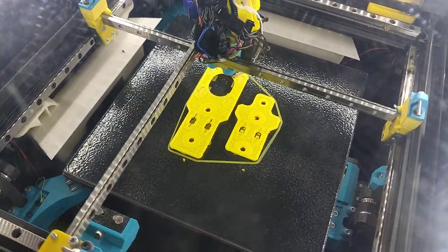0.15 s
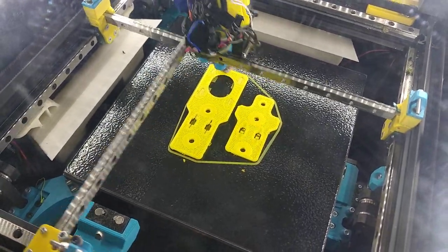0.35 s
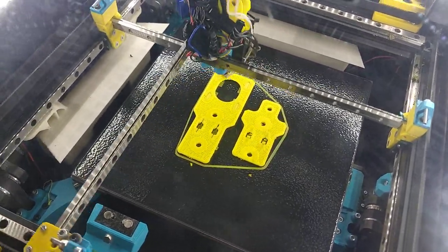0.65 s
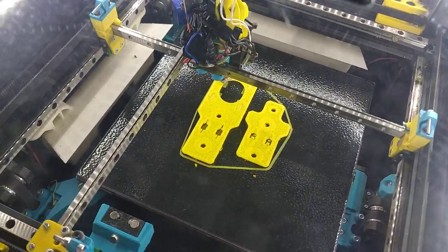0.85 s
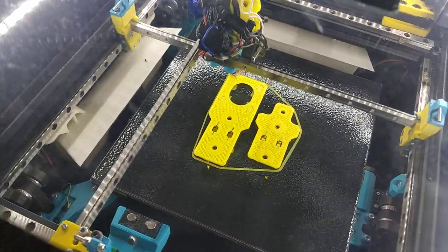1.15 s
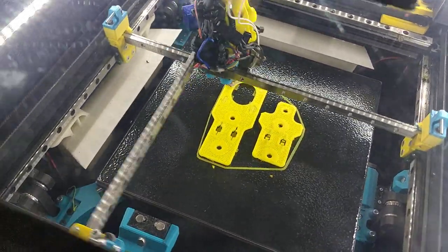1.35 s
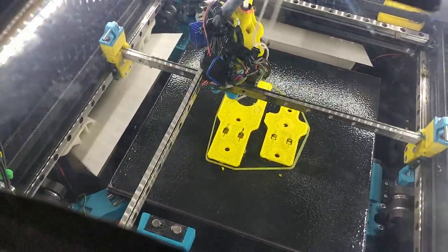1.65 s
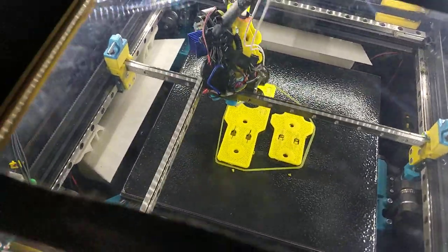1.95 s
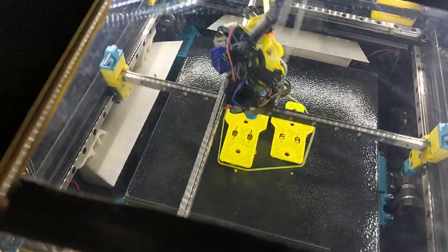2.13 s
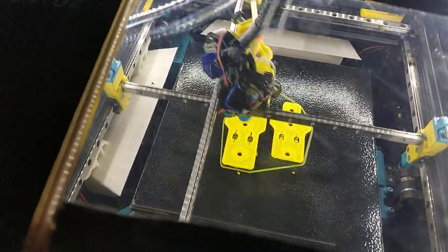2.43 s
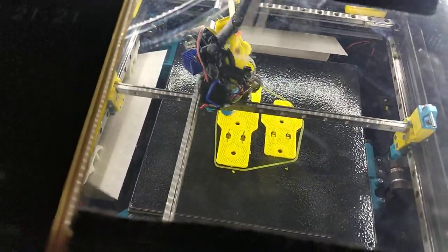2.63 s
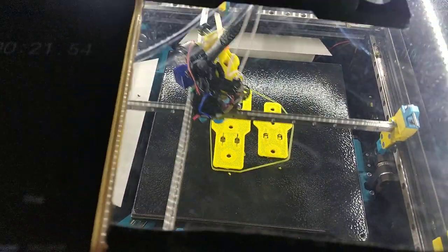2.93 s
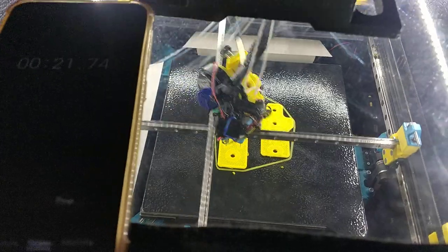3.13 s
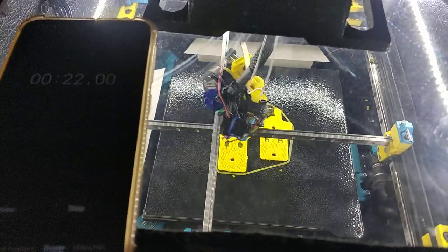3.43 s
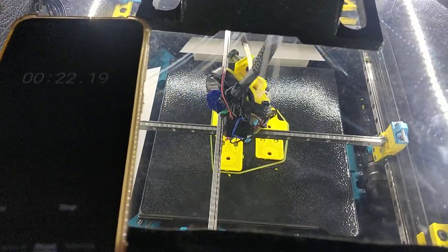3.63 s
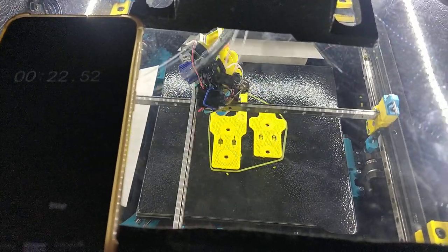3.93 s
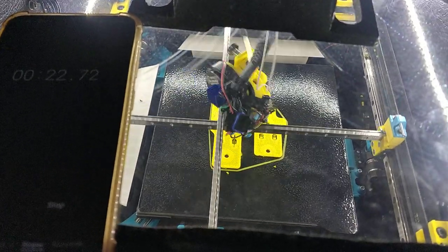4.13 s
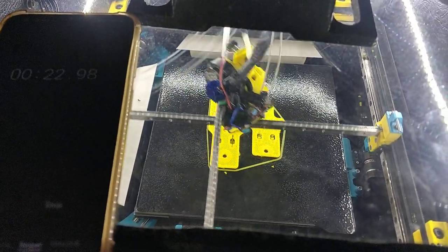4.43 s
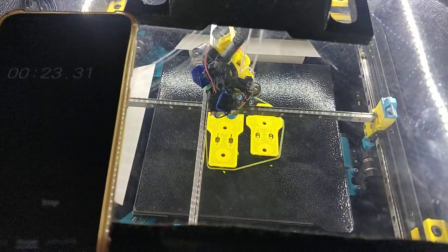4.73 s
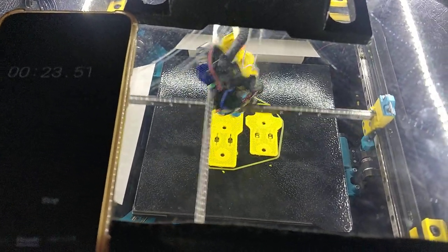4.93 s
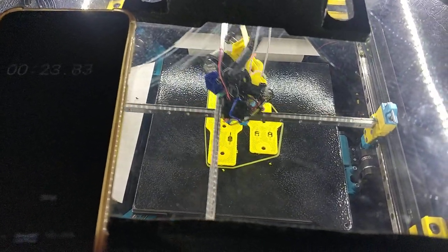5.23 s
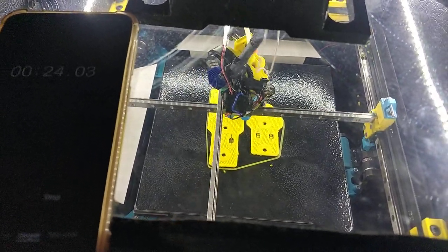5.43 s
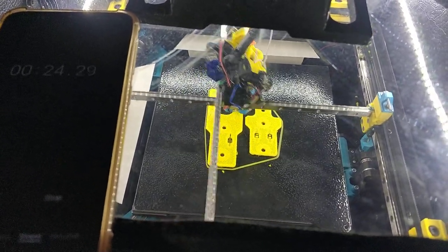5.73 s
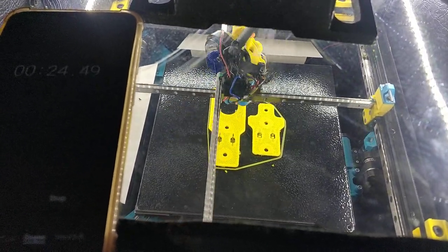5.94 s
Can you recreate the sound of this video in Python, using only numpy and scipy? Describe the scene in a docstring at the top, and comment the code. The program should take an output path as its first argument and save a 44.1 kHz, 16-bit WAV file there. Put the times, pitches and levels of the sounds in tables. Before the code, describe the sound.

A 3D printer runs fast, heard from just above its cabinet. The motors chirp and buzz in short strokes, the rails rumble and the frame hums low over steady fan hiss. A soft pop hits the right side near the start. Irregular thuds and faint bright ticks follow as the print head changes direction. The motion eases briefly, then tightens into a run of quick clacks near the end.

```python
"""3D printer, close overhead

Microphones just above the cabinet, where a fast printer fills in a small part. Short strokes of the
head shake the frame, panel and gantry; the steppers chirp and the carriages rumble on their rails.
Fans hum and hiss throughout. Filament ticks, one pop of pressure lands on the right, hard reversals
knock and loose wiring clicks. Near the end the head zigzags tightly and the thuds turn to clacks."""
import sys
import numpy as np
from scipy import signal
from scipy.fft import rfft, irfft
from scipy.io import wavfile
from scipy.ndimage import uniform_filter1d

SR = 44100
rng = np.random.default_rng(int(sys.argv[2]) if len(sys.argv) > 2 else 0)


def to_wav(s):
    """Save 16-bit WAV."""
    ch = np.atleast_2d(s).T  # columns
    pcm = np.round(np.clip(ch, -1, 1) * 32767)  # PCM
    wavfile.write(sys.argv[1], SR, pcm.astype(np.int16))


N = 268128
TIME = np.arange(N) / SR
FREQS = np.maximum(np.fft.rfftfreq(N, 1 / SR), 1)
ZIGZAG_FROM_S = 5.3

# Levels in the tables are relative: each source adds its own gain.
# how hard the head is thrown about, easing over small details: time_s, effort_db
EFFORT = [(0.0, -5), (0.7, -1.5), (1.25, -4), (1.7, 0.5), (2.0, 3), (2.25, -2.5), (2.6, 0.5), (3.1, -4.5),
          (3.45, -1.5), (3.9, -3.5), (4.1, -8.5), (4.6, -9.5), (4.8, -7.5), (5.4, -1.5), (6.08, -3.5)]
# the head slows between runs of strokes: centre_s, length_s, depth_db
LULLS = [(0.067, 0.024, 8), (0.647, 0.081, 15), (1.385, 0.044, 3), (1.746, 0.07, 10), (1.86, 0.044, 16),
         (2.21, 0.2, 0), (2.528, 0.024, 16), (2.794, 0.19, 2), (2.996, 0.087, 4), (3.325, 0.1, 3),
         (3.57, 0.12, 6), (4.19, 0.035, 1), (4.623, 0.049, 12), (4.9, 0.1, 6), (5.285, 0.072, 15),
         (5.714, 0.065, 14)]
# hard thrusts that rock the whole frame: centre_s, length_s, level_db
THRUSTS = [(0.008, 0.019, -23.5), (0.097, .044, -46), (0.366, .05, -42), (0.471, 0.063, -36),
           (0.574, .06, -42), (0.736, 0.091, -34), (0.829, .045, -35), (0.929, 0.069, -32),
           (1.035, .06, -34), (1.111, .055, -26.5), (1.252, 0.073, -30), (1.324, .055, -33),
           (1.464, 0.062, -27), (1.568, 0.0774, -29), (1.912, .044, -33.5), (1.989, 0.085, -26),
           (2.093, 0.04, -32.5), (2.348, 0.076, -29.5), (2.44, .06, -32), (2.651, .06, -47),
           (2.909, .052, -32), (3.075, .059, -33.5), (3.148, 0.058, -31), (3.473, 0.06, -40),
           (3.761, .06, -38), (3.889, .062, -32), (4.76, 0.068, -39), (4.958, 0.05, -36),
           (5.096, .053, -36.5), (5.189, 0.13, -33), (5.577, 0.079, -31), (5.75, 0.13, -36.5),
           (5.892, .08, -31), (5.999, 0.13, -32)]
# the microphones start where the frame sways most, then move off: time_s, boost_db
NEAR_FRAME = [(1.0, 4.5), (1.9, 0)]
# rumble from the rails: time_s, level_db
RAIL_LEVEL = [(0.0, 1.5), (0.55, 1), (0.65, 0), (0.8, 0), (2.0, 0.5), (2.8, 0), (3.7, -1), (3.98, 0),
              (4.1, -0.5), (5.3, 0.5), (6.08, 1.5)]
# spectrum of rails and motors: frequency_hz, level_db
RAIL_SPECTRUM = [(20, 7.5), (45, -16), (85, -23), (135, -2), (230, 4.5), (370, 2.5), (430, -0.5), (600, -4),
                 (830, -6), (920, -10.5), (1060, -9.5), (1300, -17.5), (1750, -22), (2600, -42)]
# likeness of the two microphones: frequency_hz, correlation
MIC_LIKENESS = [(40, 0.87), (160, 0.78), (330, 0.98), (700, 0.62), (1400, 0), (2800, 0.092), (16000, 0)]
# air from the fans: time_s, flow_db
AIRFLOW = [(0.0, 1), (1.0, 0.5), (2.15, 3), (3.3, 0.5), (3.85, 1.5), (4.05, 0), (4.7, 1), (5.7, 1.5),
           (6.0, 5)]
# spectrum of the rushing air: frequency_hz, level_db
RUSH_SPECTRUM = [(300, 7.5), (1200, 7.5), (2200, 4), (3200, 2), (4100, -0.5), (5100, -2), (6000, -10),
                 (6700, -8), (7700, -11), (8900, -27), (9900, -52), (15500, -37)]
# spectrum of the fine hiss: frequency_hz, level_db
HISS_SPECTRUM = [(8500, -35), (10000, -5.5), (11300, 1), (12500, 6), (14800, 5.5), (16000, 2.5)]
# the cooling duct's jet, turned towards and away from the microphones: time_s, level_db
JET_LEVEL = [(0.0, -62), (0.4, -63.5), (1.45, -63), (1.8, -65.5), (3.5, -70.5), (3.82, -63), (4.05, -79),
             (4.9, -66), (6.0, -64)]
# blade tone of the part-cooling fan, which turns away as the head moves: time_s, level_db
BLADE_LEVEL = [(0.0, -57), (0.7, -57.5), (1.1, -60), (1.9, -60.5), (2.2, -57), (2.8, -59), (3.6, -67),
               (3.9, -62), (4.6, -63), (5.7, -70), (6.08, -67)]
# fan and motor driver tones: pitch_hz, level_db
THIN_TONES = [(500, -63), (728, -66), (1100, -66), (1201, -70), (1664, -69), (2000, -80), (2100, -75),
              (2200, -77), (13001, -89), (13501, -87), (13701, -89)]
# ticks of filament and cable sleeve: start_s, level_db, relative_rasp_db, t60_s, centre_hz
TICKS = [(0.075, -50.5, -17, 0.021, 11100), (1.005, -44.5, -20, 0.025, 11980),
         (1.251, -48, -13, 0.018, 12600), (2.4198, -51, -18, 0.036, 12800), (2.6344, -61, -14, 0.04, 12700),
         (2.8219, -55, -17, 0.042, 12710), (3.312, -59, 4, 0.083, 11200), (3.417, -54, 2, 0.058, 11600),
         (3.423, -57.5, 7.5, 0.1, 12400), (5.0269, -38, -25, 0.015, 13900), (5.233, -58.5, 7, 0.072, 11400),
         (5.5947, -57, 7.5, 0.048, 13120)]
# quick passes that make the gantry sing: centre_s, length_s, level_db, step_rate_hz
PASSES = [(0.166, .041, -38.5, 332), (0.407, .044, -37, 329), (0.517, 0.085, -40.5, 326.5),
          (0.695, .044, -39, 314.3), (0.766, 0.07, -44, 326), (1.158, 0.05, -35, 314.7),
          (1.3, .055, -30, 321), (1.387, .041, -36, 326), (1.43, 0.043, -34, 313),
          (1.496, 0.035, -34.5, 330.6), (1.555, 0.041, -36.5, 330.3), (1.606, 0.035, -36, 329.8),
          (1.678, .035, -38, 329), (1.799, .07, -33.5, 323.6), (1.895, 0.046, -35.5, 315.5),
          (2.058, .07, -35, 318.7), (2.132, 0.045, -30.5, 331), (2.341, 0.058, -32, 320.2),
          (2.465, .07, -44.5, 330), (2.603, 0.051, -38, 329), (2.687, .07, -40, 323.2),
          (2.76, 0.077, -41.5, 334.5), (2.83, 0.064, -40, 330.2), (3.143, 0.054, -42, 316),
          (3.448, 0.087, -45, 325.6), (3.806, .051, -35.5, 330.5), (4.39, .041, -41, 336),
          (4.648, 0.029, -36.5, 323.3), (4.713, .03, -39, 323.6), (4.749, 0.04, -35.5, 332),
          (4.824, 0.035, -36.5, 333), (4.859, .028, -37, 326), (4.949, 0.041, -35, 329),
          (5.007, .03, -37, 320), (5.041, 0.029, -34.5, 337.6), (5.112, 0.037, -38.5, 330.5),
          (5.35, .05, -37.5, 330), (5.425, 0.042, -38, 313.3), (5.533, 0.048, -38, 323.4),
          (5.66, 0.037, -36, 333.4), (5.786, .052, -35.5, 323.8), (5.89, 0.068, -34, 326),
          (5.978, 0.025, -30.5, 327.3)]
# reversals that take up slack: start_s, blow_db, boom_db
KNOCKS = [(0.365, -35.5, -44), (0.584, -33.5, -50), (0.784, -41, -17), (1.221, -60, -20.5),
          (1.339, -38, -27.5), (1.4437, -37, -25), (1.554, -35.5, -19.5), (1.9263, -40, -21.5),
          (2.01, -34, -12.5), (2.0688, -34.5, -15.5), (2.106, -38, -43), (2.3414, -34.5, -16),
          (2.647, -40, -18), (2.906, -32.5, -17.5), (3.075, -35, -17), (3.1633, -34, -21),
          (3.179, -40, -20), (3.397, -31.5, -20), (3.426, -31, -18), (3.4716, -33, -19),
          (3.488, -29.5, -22), (3.699, -43, -31), (3.888, -33.5, -19.5), (4.231, -35.5, -23),
          (4.287, -35.5, -31.5), (4.7178, -34, -37), (4.759, -33.5, -23.5), (4.965, -36.5, -22),
          (5.1673, -31.5, -14.5), (5.1765, -36, -24), (5.411, -30.5, -35), (5.4449, -33.5, -40),
          (5.513, -31, -43), (5.544, -27, -30), (5.6, -24, -28), (5.638, -39, -21.5), (5.822, -28, -25),
          (5.8635, -30.5, -40), (5.9195, -31, -39), (5.9324, -26.5, -41), (5.973, -30, -50),
          (6.0106, -31, -50), (6.0287, -27, -42), (6.0416, -28, -32)]
# modes of the gantry at the end of an open stroke: pitch_hz, t60_s, level_db
THUD_MODES = [(333, 0.064, 2), (502, 0.026, 1), (630, 0.017, 6.5), (758, 0.014, 4), (973, 0.019, -2.5),
              (1360, 0.011, -5.5), (1660, .012, -12)]
# modes of the booming panel: pitch_hz, t60_s, level_db
PANEL_MODES = [(154, 0.048, -12.5), (184.3, 0.1, 0.5), (265, 0.064, -8.5)]
# modes of the carriage in the tight zigzag: pitch_hz, t60_s, level_db
CLACK_MODES = [(345, .04, -1), (570, .014, -2.5), (770, .016, -1), (995, .02, 1), (1150, .014, 1),
               (1675, .015, 0), (2700, .014, -3)]
# loose wiring on the head: start_s, peak_db
WIRING_CLICKS = [(1.852, -51), (1.866, -45), (1.897, -43), (1.9231, -46), (1.95, -48)]

# how each part follows effort (the air follows flow): base_db, db_per_db, lull_share
FRAME_DRIVE, SHUDDER_DRIVE = (-36.5, .55, .58), (-41.5, 1.65, .22)
PANEL_DRIVE, GANTRY_DRIVE, RAIL_DRIVE = (-41, .92, .79), (-44, .7, .4), (-44.5, .086, .26)
RUSH_DRIVE, HISS_DRIVE = (-60.5, .83, .17), (-69, 1.24, .23)


def undb(db):
    """Decibels to gain."""
    return 10 ** (np.asarray(db) / 20)


def unit(x):
    """Scale to rms 1."""
    return x / np.sqrt(np.mean(x ** 2))


def curve(table, column=1):
    """One column of a timed table, with a value for every sample."""
    columns = np.transpose(table)
    return np.interp(TIME, columns[0], columns[column])


def across(points):
    """Join (frequency_hz, value) points on a log-frequency axis."""
    hz, value = np.transpose(points)
    return np.interp(np.log(FREQS), np.log(hz), value)


def colour(x, spectrum):
    """Filter a sound by a spectrum, at rms 1."""
    return unit(irfft(rfft(x) * undb(across(spectrum)), N))


def resonate(x, hz, width_hz):
    """A two-pole resonance."""
    return signal.lfilter(*signal.iirpeak(hz, hz / width_hz, fs=SR), x)


def lowpass(x, hz, order):
    """A causal low-pass."""
    return signal.sosfilt(signal.butter(order, hz, fs=SR, output="sos"), x)


def wander(rate_hz):
    """Smooth random drift with a spread near 1."""
    hold = int(SR / rate_hz)
    steps = np.repeat(rng.standard_normal(N // hold + 1), hold)
    return 1.3 * uniform_filter1d(steps, hold)[:N]


def glide(hz):
    """A sine of rms 1 that follows a pitch."""
    return np.sqrt(2) * np.sin(2 * np.pi * np.cumsum(hz) / SR)


def pan(left_db):
    """Channel gains that put the left microphone left_db above the right."""
    return undb(np.array([[left_db], [-left_db]]) / 2)


def add(track, start_s, sound):
    """Mix a sound in at start_s."""
    i = max(int(start_s * SR), 0)
    track[i:i + len(sound)] += sound[:N - i]


def swell(centre_s, length_s):
    """A smooth rise and fall, 1 at its top and length_s wide at half height."""
    return np.exp(-np.log(2) * np.minimum((2 * (TIME - centre_s) / length_s) ** 2, 50))


def surges(rows):
    """Strength of a run of swells, summed in power."""
    return np.sqrt(sum((undb(db) * swell(s, length_s)) ** 2 for s, length_s, db, *_ in rows))


def driven(drive, control_db, lull_db):
    """Level in dB of a part that follows a control and sinks in the lulls."""
    base_db, db_per_db, lull_share = drive
    return base_db + db_per_db * control_db - lull_share * lull_db


def head_strokes(stroke_s=.045, scatter=.45, count=400):
    """The head speeds up and brakes along each short line: its relative speed, and a jerk at each turn."""
    chance = rng.standard_normal((count, 3))
    turns_s = np.cumsum(stroke_s * np.exp(scatter * chance[:, 0]))
    progress = np.interp(TIME, np.r_[0, turns_s], np.arange(count + 1))
    stroke = progress.astype(int)
    cruise = np.exp(.25 * chance[:, 1])[np.minimum(stroke, count - 1)]
    speed = cruise * np.minimum(1.4 * np.abs(np.sin(np.pi * progress)), 1)
    jerks = np.diff(stroke, prepend=0) * cruise * (-1.) ** stroke
    return speed, jerks


def shaken(jerks, hz, width_hz, rough, even_s):
    """Jerks and rolling roughness keep one resonance ringing at an even strength."""
    push = unit(jerks) + rough * rng.standard_normal(N)
    swing = resonate(resonate(push, hz, width_hz), hz, 2 * width_hz)
    return swing / np.sqrt(uniform_filter1d(swing ** 2, int(even_s * SR)) + 1e-12)


def frame_sway(jerks, frame_db, shudder_db, mode_hz=55, shudder_hz=132):
    """The heavy frame hums at its lowest mode, heaves and twists a little; its joints shudder."""
    strength = np.hypot(undb(frame_db - 3), undb(-1.5) * surges(THRUSTS))
    hum = strength * glide(mode_hz * (1 + .062 * wander(16)))
    loose = shaken(jerks, mode_hz, width_hz=13, rough=.87, even_s=.11) * undb(frame_db - 7)
    rocking = signal.sosfiltfilt(signal.butter(6, 68, fs=SR, output="sos"), hum + loose)
    shudder = unit(resonate(resonate(rng.standard_normal(N), shudder_hz, 71), shudder_hz, 90))
    rumble = lowpass(rng.standard_normal((2, N)), 68.4, order=4)
    heave, twist = unit(resonate(rumble, hz=40.7, width_hz=15.6))
    feet = undb(-7) * heave + undb(-9) * twist * np.array([[1], [-1]])
    return rocking * pan(2.2) + undb(shudder_db) * shudder + undb(frame_db) * feet


def panel_drone(jerks, level_db, zigzag_db=4.5):
    """The strokes keep a cabinet panel ringing, harder in the tight zigzag."""
    zigzag = uniform_filter1d(1. * (TIME > ZIGZAG_FROM_S), SR // 20)
    ringing = shaken(jerks, hz=187, width_hz=26, rough=.86, even_s=.072)
    return ringing * undb(level_db + zigzag_db * zigzag)


def gantry_drone(jerks, level_db):
    """The same strokes ring the gantry, higher in pitch than the panel."""
    return shaken(jerks, hz=326, width_hz=20, rough=.61, even_s=.068) * undb(level_db)


def rails(speed):
    """Bearing balls and belt teeth patter, louder in the middle of a stroke."""
    patter = rng.standard_normal(N) * undb(2 * wander(350)) * (1 + .25 * speed)
    return colour(patter, RAIL_SPECTRUM)


def steppers(speed, step_hz=430, overtone_db=-5):
    """Each of two motors sings at its step rate, so every stroke is a short chirp."""
    chirps = 0
    for share in (1, np.exp(.25 * wander(12))):
        phase = 2 * np.pi * np.cumsum(step_hz * speed * share) / SR
        chirps += sum(undb(overtone_db * k) * np.sin((k + 1) * phase) for k in range(4))
    return colour(chirps, RAIL_SPECTRUM)


def cabinet_scatter(x, t60_s=.11):
    """Close walls scatter the sound: bass stays alike at both microphones, treble does not."""
    t = TIME[:SR // 8]
    echoes = rfft(rng.standard_normal(len(t)) * undb(-60 * t / t60_s), N)
    alike = across(MIC_LIKENESS)
    mid = irfft(rfft(x) * np.sqrt((1 + alike) / 2), N)
    side = irfft(rfft(x) * np.exp(1j * np.angle(echoes)) * np.sqrt((1 - alike) / 2), N)
    return np.array([mid + side, mid - side])


def thin_tone(hz, level_db, waver_hz=3):
    """A fan or motor driver tone that wavers in pitch and strength."""
    return undb(level_db + 1.8 * wander(9.7)) * glide(hz + waver_hz * wander(14))


def fans(lull_db, jet_hz=5150, blade_hz=989):
    """Rushing air, a jet from the cooling duct, a fine hiss on the left and thin tones."""
    flow_db = curve(AIRFLOW)
    gust_db = 1.1 * wander(18) + .8 * wander(150)
    rush = colour(rng.standard_normal((2, N)), RUSH_SPECTRUM)
    rush *= undb(driven(RUSH_DRIVE, flow_db, lull_db) + 7)
    jet = unit(resonate(resonate(rng.standard_normal((2, N)), jet_hz, 1700), jet_hz, 1700))
    jet *= undb(curve(JET_LEVEL) - .25 * lull_db - 1)
    hiss = colour(rng.standard_normal((2, N)), HISS_SPECTRUM)
    hiss *= undb(driven(HISS_DRIVE, flow_db, lull_db) + 2.5) * pan(10.2)
    blade = thin_tone(blade_hz, curve(BLADE_LEVEL), waver_hz=4) * pan(2)
    tones = np.array([sum(thin_tone(hz, db) for hz, db in THIN_TONES) for _ in range(2)])
    return (rush + jet + hiss) * undb(gust_db) + blade + tones


def filament_ticks(rise_s=.001, width_hz=2600):
    """Filament and cable sleeve make small bright scrapes on the left, each at its own pitch."""
    out, t = np.zeros(N), TIME[:SR // 8]
    for start_s, level_db, rasp_db, t60_s, hz in TICKS:
        noise = rng.standard_normal((2, len(t)))
        bright = unit(resonate(resonate(noise[0], hz, width_hz), hz, width_hz))
        rasp = undb(rasp_db - 5) * unit(resonate(noise[1], hz=6000, width_hz=1800))
        envelope = (1 - np.exp(-t / rise_s)) * undb(-60 * t / t60_s)
        add(out, start_s, undb(level_db - 2.5) * (bright + rasp) * envelope)
    return out * pan(15)


def gantry_song(sag=.03):
    """The gantry sings at the step rate, which sits lower while the head speeds up and brakes."""
    cruising = np.minimum(sum(swell(s, length_s) for s, length_s, *_ in PASSES), 1)
    step_hz = curve(PASSES, column=3) * (1 + sag * (cruising - .8) + .008 * wander(30))
    return undb(-1) * surges(PASSES) * glide(step_hz)


def pressure_pop(start_s=.2265, decay_s=.05, swing_hz=7):
    """A pop of pressure with a sharp front, mostly on the right microphone."""
    out, t = np.zeros(N), TIME[:SR // 4]
    front = 1 - (1 - undb(-5)) * np.exp(-t / .00048)
    add(out, start_s, undb(-19) * front * np.exp(-t / decay_s) * np.cos(2 * np.pi * swing_hz * t))
    out -= resonate(out, hz=8700, width_hz=4400)  # the microphone is deaf near 9 kHz
    return lowpass(out, 14000, order=1) * np.array([[.15], [1.9]])


def struck(modes, t, scatter):
    """The modes of one part ring down, a little different in pitch and strength at every blow."""
    hz, t60_s, level_db = np.transpose(modes)[:, :, None]
    stray_db, detune = rng.standard_normal((2, len(hz), 1))
    sines = np.sin(2 * np.pi * hz * (1 + scatter * detune) * t)
    return np.sum(sines * undb(level_db + stray_db - 60 * t / t60_s), axis=0)


def near_walls(x, wet_db, right_lag_samples=0, t60_s=.018):
    """The direct sound reaches the microphones; close walls answer a moment later."""
    t = TIME[:SR // 8]
    tail = rng.standard_normal((2, len(t))) * undb(-60 * t / t60_s) * (t > .002)
    tail /= np.sqrt(np.sum(tail ** 2, axis=1, keepdims=True))
    direct = np.array([x, np.roll(x, right_lag_samples)])
    return direct + undb(wet_db) * signal.fftconvolve(x[None], tail, axes=1)[:, :N]


def reversal_knocks(radiate_hz=330, boom_rise_s=.013):
    """A hard reversal takes up slack: the gantry thuds or the carriage clacks, then the panel booms."""
    blows, booms, t = np.zeros(N), np.zeros(N), TIME[:SR // 4]
    for start_s, blow_db, boom_db in KNOCKS:
        if start_s > ZIGZAG_FROM_S:
            modes, top_hz, gain_db = CLACK_MODES, 1950, 4.5
        else:  # a long open stroke lands duller and harder
            modes, top_hz, gain_db = THUD_MODES, 1250, 7
        blow = lowpass(struck(modes, t, scatter=.022), top_hz, order=4)  # plastic and rubber cushion it
        blow -= lowpass(blow, radiate_hz, order=1)  # small parts radiate little bass
        add(blows, start_s, undb(blow_db + gain_db) * blow / np.abs(blow).max())
        boom = struck(PANEL_MODES, t, scatter=.014) * (1 - np.exp(-t / boom_rise_s))
        add(booms, start_s, undb(boom_db + 4) * boom)
    return near_walls(blows, wet_db=-9.5, right_lag_samples=5) + booms


def wiring_clicks(band_hz=(2820, 4220), t60_s=.028):
    """Small plastic parts of the loose wiring tap together and ring for an instant."""
    out, t = np.zeros(N), TIME[:SR // 20]
    band = signal.butter(3, band_hz, "bandpass", fs=SR, output="sos")
    for start_s, peak_db in WIRING_CLICKS:
        tap = signal.sosfilt(band, rng.standard_normal(len(t)) * undb(-60 * t / t60_s))
        add(out, start_s, undb(peak_db) * tap / np.abs(tap).max())
    return near_walls(out, wet_db=-11)


def scene():
    """From just above the cabinet: one motion drives frame, panel, motors and rails, over the fans."""
    effort_db, near_db = curve(EFFORT), curve(NEAR_FRAME)
    lull_db = sum(depth_db * swell(s, length_s) for s, length_s, depth_db in LULLS)
    speed, jerks = head_strokes()
    panel = panel_drone(jerks, driven(PANEL_DRIVE, effort_db, lull_db))
    gantry = gantry_drone(jerks, driven(GANTRY_DRIVE, effort_db, lull_db)) + gantry_song()
    travel = undb(5.5) * rails(speed) + undb(-4) * steppers(speed)
    travel *= undb(driven(RAIL_DRIVE, effort_db, lull_db) + curve(RAIL_LEVEL))
    frame_db = driven(FRAME_DRIVE, effort_db, lull_db) + near_db
    shudder_db = driven(SHUDDER_DRIVE, effort_db, lull_db) + near_db
    body = frame_sway(jerks, frame_db, shudder_db) + panel * pan(-.4) + gantry * pan(3.5)
    bed = body + fans(lull_db) + cabinet_scatter(travel)
    return bed + reversal_knocks() + filament_ticks() + wiring_clicks() + pressure_pop()


def record(dry):
    """The recorder cuts the top steeply at 15.75 kHz."""
    return signal.sosfilt(signal.ellip(10, .2, 80, 15750, fs=SR, output="sos"), dry)


dry = scene()
out = record(dry)
to_wav(out)
```